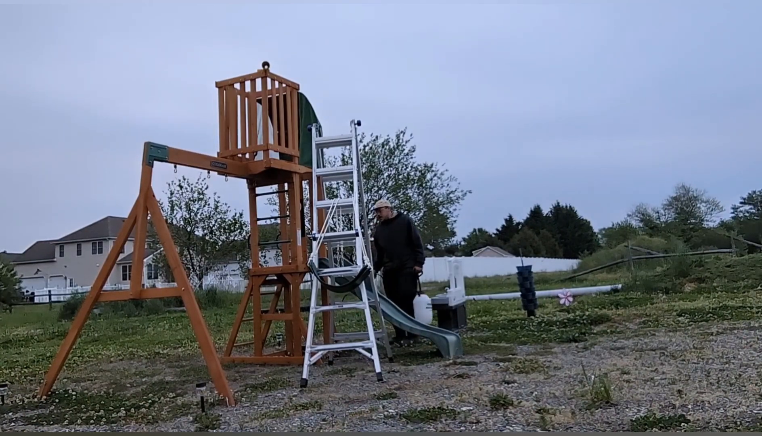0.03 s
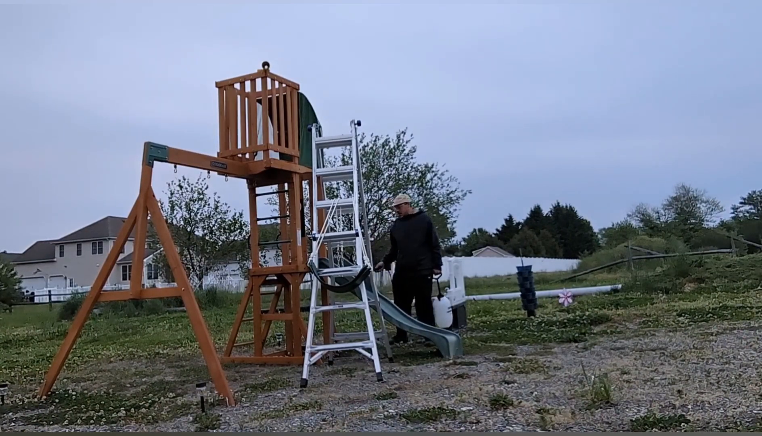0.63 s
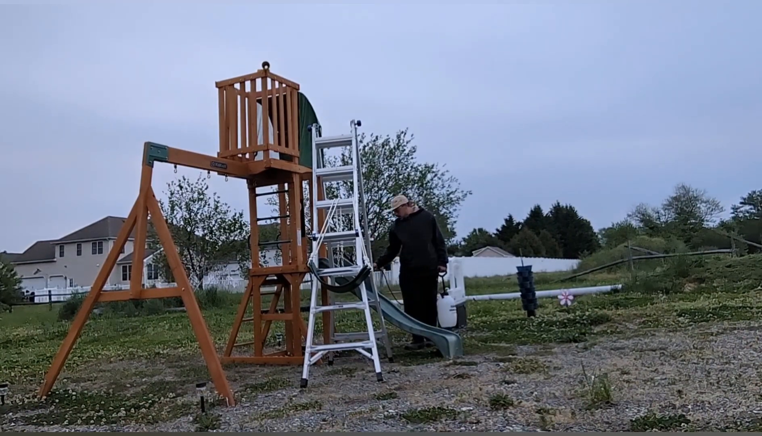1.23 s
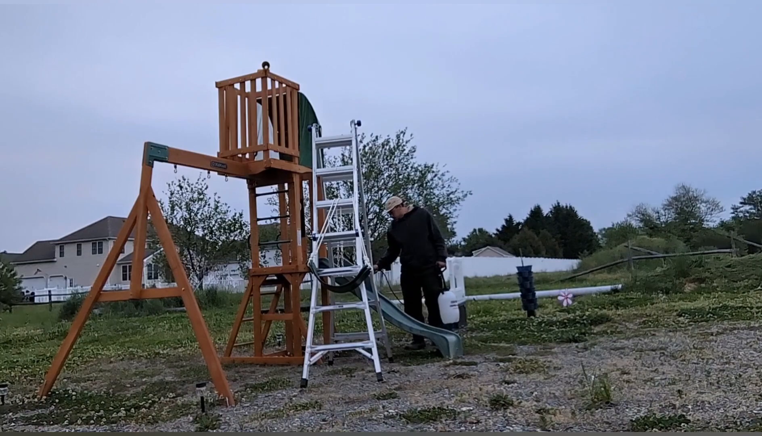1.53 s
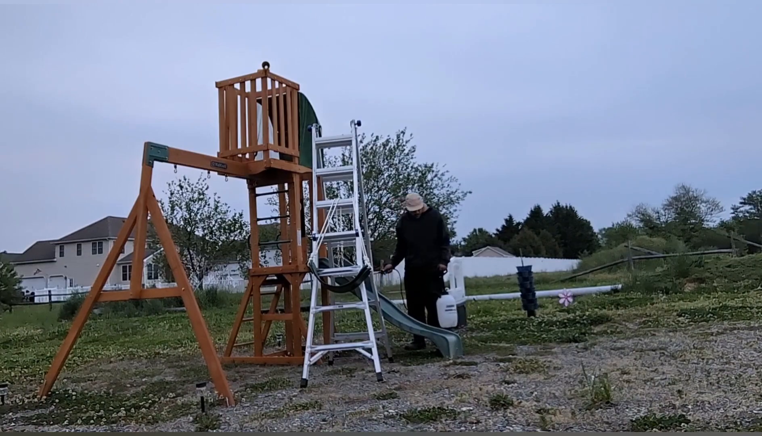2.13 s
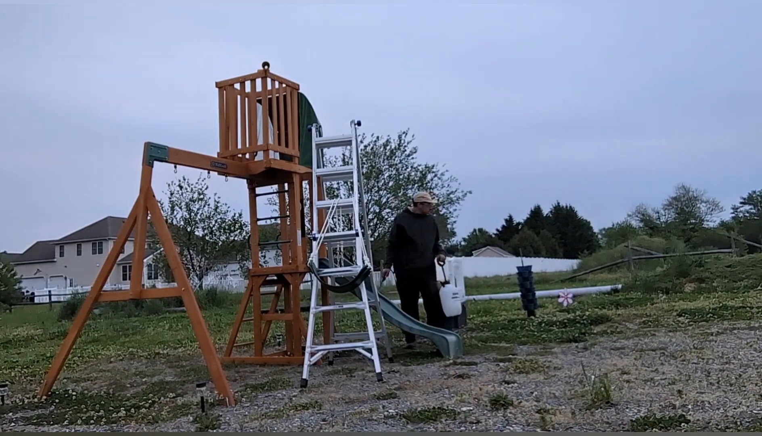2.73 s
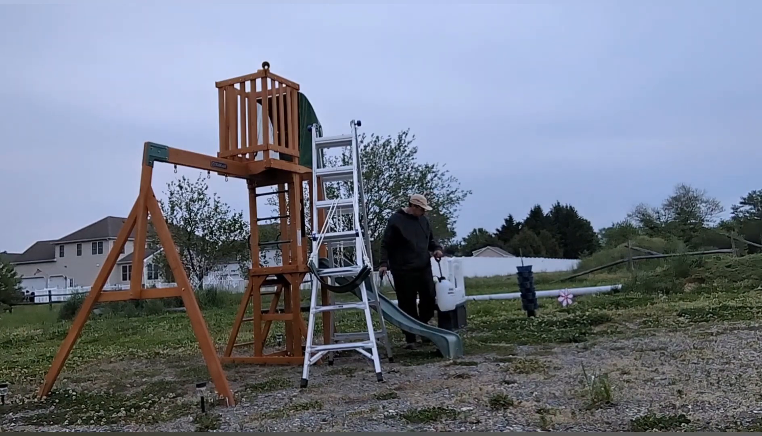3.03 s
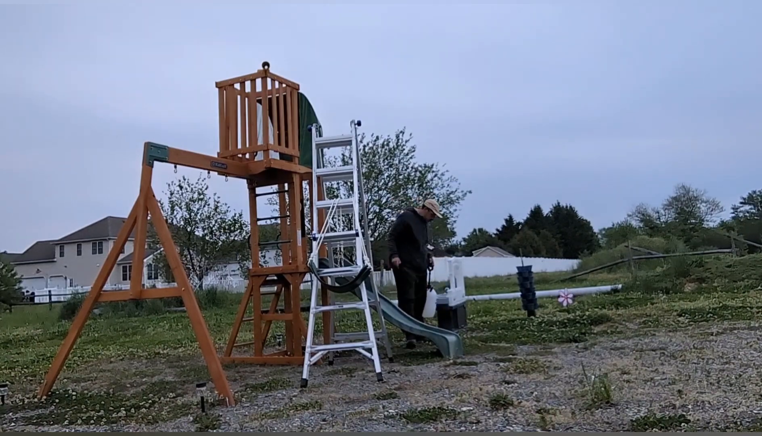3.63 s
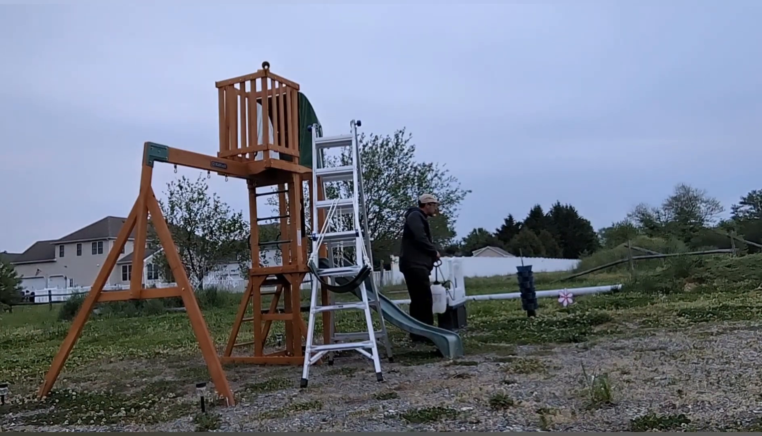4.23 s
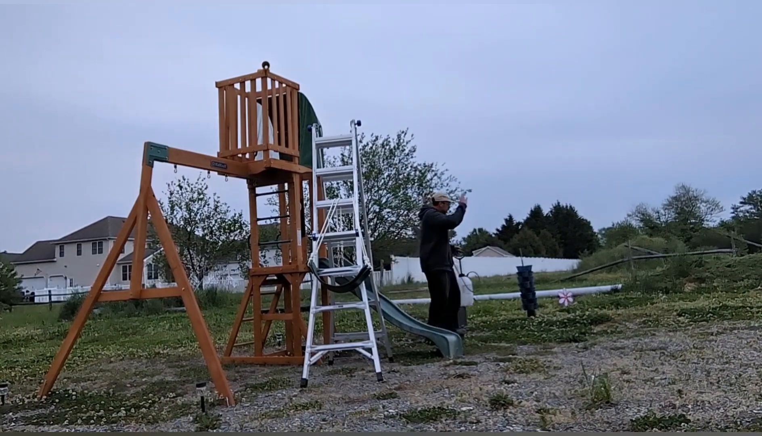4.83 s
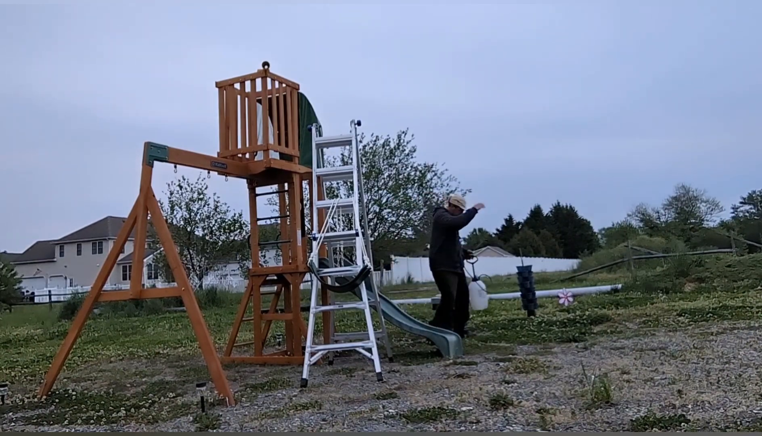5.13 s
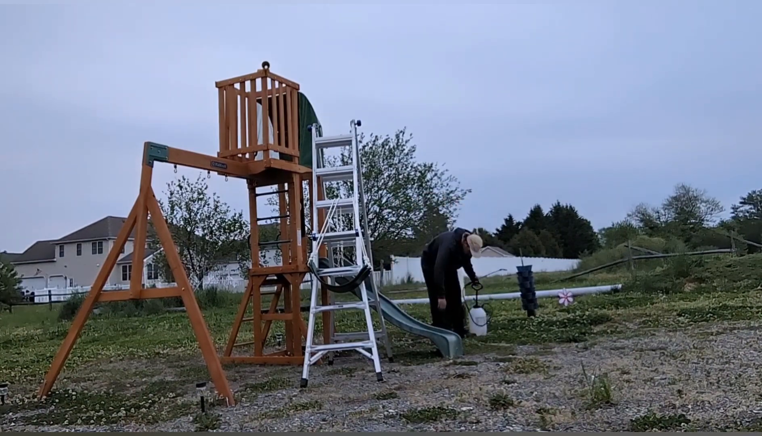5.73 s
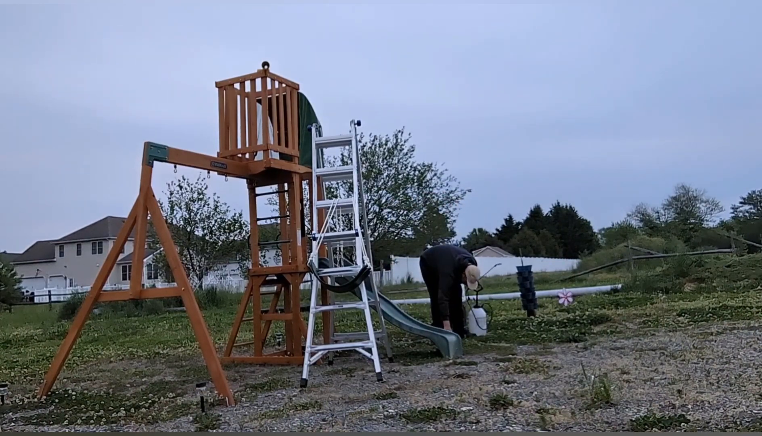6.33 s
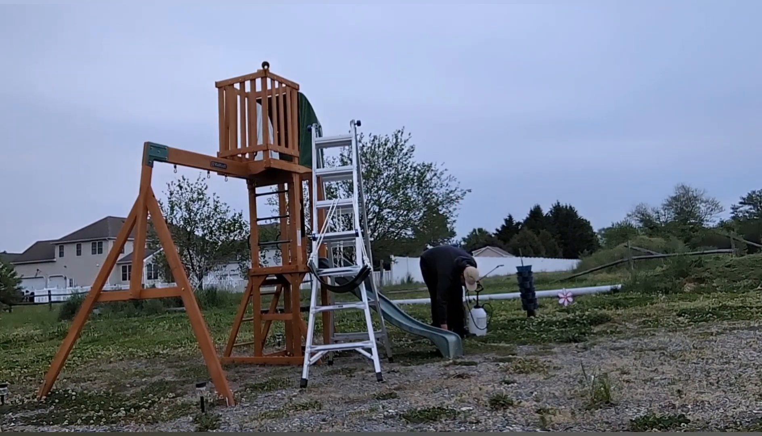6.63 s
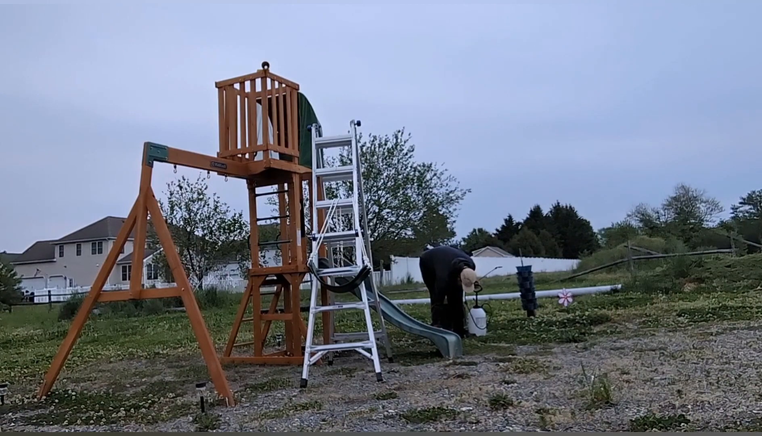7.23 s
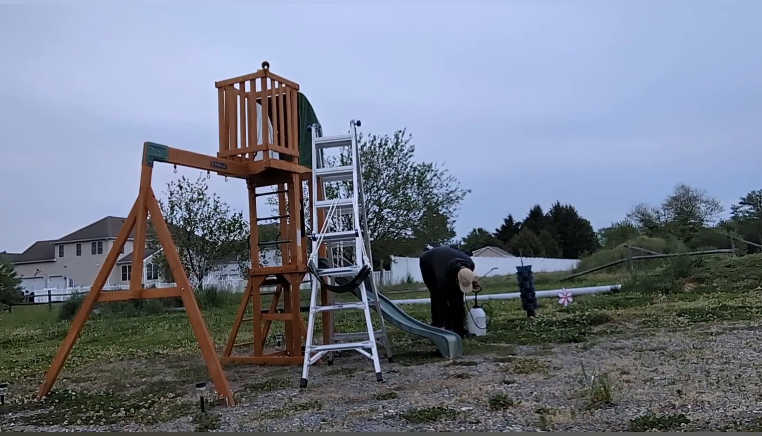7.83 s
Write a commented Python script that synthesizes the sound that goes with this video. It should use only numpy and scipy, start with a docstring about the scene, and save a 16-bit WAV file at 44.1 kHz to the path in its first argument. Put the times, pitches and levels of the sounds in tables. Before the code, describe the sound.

A small diesel tractor idles some way off, slightly to the right, in an open yard: a steady low puffing drone with light metallic clatter and hiss. Distant traffic lies softly behind it throughout. Closer and a little left, small dry ticks come around 0.9 and 1.5 seconds, and a hollow plastic jug is knocked at about 1.7 and 2.6 seconds, then faintly at 4.9. A soft dull bump comes at 3.7 seconds. From about 4.5 seconds the engine takes up a load, sagging slightly and growling around 5.5 as it pulls away. From 5.1 seconds to the end its loose panels rattle in short bouts, joined by metal clanks and dull bumps, the loudest at about 6.2. A few more ticks fall near 5.8 and 6.8 seconds. From about 6 seconds a light breeze rumbles on the microphones, building until the end at 8 seconds.

```python
"""A three-cylinder diesel, probably a small tractor, idles some way off to the right of an open yard.
Its firings puff from the pipe and ping the block. Then it pulls away: it sags under the load, growls,
and its loose panels rattle in bouts, with clanks and dull bumps, one louder than the rest. In front of
the two microphones a hollow plastic jug is knocked about by a play set, among a few small ticks.
Distant traffic lies behind it all, and late on a breeze gets up on the microphones."""
import sys
import numpy as np
from scipy import signal
from scipy.fft import rfft, irfft, next_fast_len
from scipy.io import wavfile
from scipy.ndimage import uniform_filter1d, map_coordinates

SR = 44100
rng = np.random.default_rng(int(sys.argv[2]) if len(sys.argv) > 2 else 0)


def file_out(sig):
    """Save sig as 16-bit WAV at sys.argv[1]."""
    # one column per channel
    cols = np.atleast_2d(sig).T
    # limit, then scale
    lim = np.clip(cols, -1, 1)
    pcm = np.round(lim * 32767).astype(np.int16)
    wavfile.write(sys.argv[1], SR, pcm)


N = 352359

# The crankshaft, sagging twice as it pulls away. Each row: time in seconds, four-stroke cycles a second.
ENGINE_SPEED = [(0.0, 15.952), (1.0, 15.939), (4.3, 15.939), (4.7, 15.873), (5.05, 15.9), (5.4, 15.739),
                (5.75, 15.615), (6.0, 15.825), (6.18, 16.074), (6.42, 15.709), (6.65, 15.927), (7.1, 15.88),
                (7.5, 15.904), (8.0, 15.764)]
# How hard the tractor pulls. Each row: time in seconds, load from 0 to 1.
ENGINE_LOAD = [(0, 0.15), (4.3, 0.15), (4.7, 0.35), (5.4, 0.46), (6.0, 0.72), (7.0, 0.76), (7.7, 0.83)]
IDLE_CYCLE_HZ = ENGINE_SPEED[0][1]
LABOUR_S, LABOUR_WIDTH_S = 5.53, 0.25   # the drive takes hold
def engine():
    """The diesel across the yard: one crankshaft times its exhaust, growl, clatter and panels."""
    load, = in_time(ENGINE_LOAD)
    cycles = np.cumsum(in_time(ENGINE_SPEED)[0]) / SR
    labour = np.exp(-((TIME - LABOUR_S) / LABOUR_WIDTH_S) ** 2)
    phases = puff_phases()
    body = exhaust_drone(cycles, load, labour, phases) + low_swells()
    body += growl(cycles, load, labour) + pipe_whine(cycles, labour, phases)
    metal = diesel_clatter(cycles, load) + loose_panels(cycles, load)
    return placed(below(body, 1800), left_db=1.3) + placed(below(metal, 7000), left_db=-0.1) + hiss(load)


# The pipe's note, idling and pulling. Each row: multiple of the cycle rate, relative level in dB.
IDLE_ORDERS = [(1, -40), (2, -35), (3, -5), (4, -15), (5, -20), (6, -2), (7, -10), (8, -7), (9, -4),
               (10, 1.5), (11, -17), (12, -9), (13, -19), (14, -10), (15, 1), (16, -21), (17, -21),
               (18, -16), (19, -25), (20, -20), (21, -24), (22, -22), (23, -24), (24, -21), (25, -24),
               (26, -21), (27, -14), (28, -23), (29, -24), (30, -13), (31, -25), (32, -21), (33, -16),
               (34, -26), (35, -29), (36, -20), (37, -28), (38, -25), (39, -22), (40, -28), (45, -25)]
LOADED_ORDERS = [(3, -13), (6, -6), (9, 0.5), (10, -12.5), (12, -8.5), (15, -3.5), (18, -15), (21, -47),
                 (24, -22), (27, -21), (30, -7), (33, -13.5), (36, -11), (39, -12), (42, -22.5), (48, -22),
                 (57, -17.5)]
# The exhaust rumble under the note. Each row: frequency in Hz, relative level in dB.
RUMBLE_SPECTRUM = [(20, -30), (33, -21), (42, 1), (52, -3.5), (90, -5), (130, 3.5), (220, 3), (290, -7),
                   (500, -26)]
def exhaust_drone(cycles, load, labour, phases):
    """Pipe and fan together: load leaves mainly the firing orders, and the drone sinks as it labours."""
    idle = (1 - 1.04 * load) * from_db(-3) * order_tones(cycles, IDLE_ORDERS, phases, waver=0.034)
    pulling = load * from_db(-6) * order_tones(cycles, LOADED_ORDERS, phases, waver=0.25)
    rumble = from_db(-12.5 + 5 * load) * coloured(rng.standard_normal(N), RUMBLE_SPECTRUM)
    hum = from_db(-0.8 * load) * fan_and_pump(cycles)
    return from_db(-46.5 + 4.5 * load - 3.5 * labour) * (idle + pulling + rumble + hum)


def puff_phases(smear_turns=0.4):
    """The upper firing orders keep step and give each puff an edge, which the pipe smears."""
    orders, scatter = np.arange(64), rng.random(64)
    in_step = (orders % 3 == 0) & (orders >= 18)
    first_firing = FIRINGS[0][0]
    return np.where(in_step, smear_turns * scatter - orders * first_firing, scatter)


# Three firings, then valve and injector taps. Each row: place in the cycle from 0 to 1, relative dB.
CONTACTS = [(.147, 0), (.468, -1.5), (.815, -1), (.062, -9), (.105, -7), (.125, -8), (.18, -8), (.387, -8),
            (.452, -6), (.5, -10), (.612, -11), (.79, -9), (.865, -10), (.965, -10)]
FIRINGS = CONTACTS[:3]
# One cylinder's injection and firing. Each row: place in the cycle from 0 to 1, relative dB.
CYLINDER_PINGS = [(.0447, -7), (.13, 0)]
# What a ping rings. Each row: frequency in Hz, relative level in dB, seconds to fall 60 dB.
BLOCK_RESONANCES = [(1722, -13, .04), (2056, 2, .03), (2230, -5, .016)]
# The tapped block, heard across the yard. Each row: frequency in Hz, relative level in dB.
BLOCK_SPECTRUM = [(700, -63), (1150, 1.5), (1350, -20.5), (1720, 5), (1930, -3.5), (2056, -4.5),
                  (2300, -2.5), (2620, -10), (2790, -2.5), (2930, -15), (3100, -9), (3700, -16),
                  (5500, -32), (9000, -53)]
# Orders that meet the valve cover's resonances. Each row: multiple of the cycle rate, relative dB.
COVER_ORDERS = [(102, -3), (108, -2), (154, -3), (162, -4), (174, -6), (175, 0), (178, -5), (195, -9)]
# Slight swells in the clatter. Each row: time in seconds, gain in dB.
CLATTER_SWELL = [(0, -2), (.6, -2.2), (.98, -0.5), (1.5, -2.5), (3.4, -2.5), (3.78, -1), (4.0, -3)]
def diesel_clatter(cycles, load):
    """Taps, block pings, the singing cover and a scattered wash: even at idle, looser under load."""
    shaky = cycles + (0.0002 + 0.003 * load) * drift(30)
    taps = hammer(shaky, CONTACTS, np.ones(1), uneven_db=3)
    pings = [(place + cylinder / 3, db) for cylinder in range(3) for place, db in CYLINDER_PINGS]
    block = hammer(shaky, pings, strike(BLOCK_RESONANCES, spread_db=0), uneven_db=0.5)
    cover = order_tones(shaky, COVER_ORDERS, rng.random(200), waver=0.31)
    ringing = from_db(-6 * load) * (from_db(1.9) * block + from_db(-1.5) * cover)
    pulses = blows(cycles, CONTACTS, decay_s=0.003, uneven_db=0.3, sustain=0.38)
    wash = rms_one(pulses * cyclic_noise(cycles, fresh=0.12 + 0.8 * load))
    impacts = from_db(-3 - 4 * load) * taps + from_db(2 * load) * wash
    knock = from_db(6 + 2 * load) * coloured(impacts, BLOCK_SPECTRUM)
    softening_db = -3.5 * np.minimum(load / 0.33, 1)   # as soon as there is something to pull
    swell_db, = in_time(CLATTER_SWELL)
    return from_db(-60.5 + 0.5 * load + softening_db + swell_db) * (knock + ringing)


# The engine body's voice. Each row: frequency in Hz, relative level in dB.
GROWL_SPECTRUM = [(30, -39), (200, -39), (290, 0), (350, 1), (430, 6.5), (520, 2), (610, -2), (720, -1.5),
                  (880, -4.5), (1000, -15), (1300, -4), (2000, -26)]
def growl(cycles, load, labour):
    """Each firing thuds through the engine body, louder and rougher as it pulls."""
    thuds = blows(cycles, FIRINGS, decay_s=0.006, uneven_db=0.7, sustain=0.7)
    vibration = thuds * cyclic_noise(cycles, fresh=0.55 + 0.4 * load)
    return from_db(-63 + 13 * load + 4 * labour) * coloured(vibration, GROWL_SPECTRUM)


# The pipe's whine. Each row: multiple of the cycle rate, relative level in dB.
WHINE_ORDERS = [(33, 0), (36, -5), (39, -2)]
def pipe_whine(cycles, labour, phases):
    """The pipe whines briefly while the engine labours."""
    return from_db(-60.5) * labour * order_tones(cycles, WHINE_ORDERS, phases, waver=0.1)


# The belt-driven fan and pump. Each row: multiple of the cycle rate, relative level in dB.
BELT_ORDERS = [(12.7, -9), (21.67, -20)]
def fan_and_pump(cycles, waver=0.15):
    """Fan and pump hum at speeds tied to the crankshaft."""
    return sum(np.sqrt(2) * from_db(db) * (1 + waver * drift(7.5)) * np.sin(2 * np.pi * order * cycles)
               for order, db in BELT_ORDERS)


# Firings throw a panel at the frame, two hard. Each row: place in the cycle from 0 to 1, relative dB.
PANEL_SLAPS = [(.09, 0), (.425, 0.5), (.77, -5)]
# The panels' buzz. Each row: frequency in Hz, relative level in dB.
PANEL_SPECTRUM = [(300, -60), (700, -38), (1100, -3.5), (1500, -6.5), (1740, 6), (1850, 1), (2100, 0.5),
                  (2300, -2.5), (2650, -1), (3050, -6.5), (3700, -10), (6000, -23.5), (9000, -60)]
# The loudest panel's ring, sliding as the frame flexes. Each row: time in seconds, pitch in Hz.
PANEL_PITCH = [(5.14, 2100), (5.3, 1960), (5.42, 2080), (5.5, 2020), (5.58, 1860), (5.95, 1980),
               (6.15, 2045), (6.6, 2090), (8, 2064)]
# Rattling on the move. Each row: start in seconds, length in seconds, level in dB.
RATTLE_BOUTS = [(5.11, 0.19, -60), (5.40, 0.188, -58), (5.93, 0.12, -65), (6.1, 0.29, -64.5),
                (6.59, 0.22, -63.5), (7.16, 0.076, -61), (7.48, 0.05, -59), (7.62, 0.13, -60),
                (7.9, 0.17, -71)]
def loose_panels(cycles, load, wander_hz=50):
    """Loose panels buzz at each firing, in bouts; one slaps the frame and rings briefly."""
    shakes = blows(cycles, PANEL_SLAPS, decay_s=0.008, uneven_db=1.2, sustain=0.7)
    buzz = coloured(shakes * cyclic_noise(cycles, fresh=0.75), PANEL_SPECTRUM)
    slaps = blows(cycles, PANEL_SLAPS, decay_s=0.0045, uneven_db=1.5, sustain=0.25)
    ring_hz = in_time(PANEL_PITCH)[0] + wander_hz * drift(120)
    ring = rms_one(uniform_filter1d(slaps, size=90) * np.sin(2 * np.pi * np.cumsum(ring_hz) / SR))
    shaking = from_db(-52) * load ** 2 + bouts(RATTLE_BOUTS, attack_s=0.0032, release_s=0.0076)
    return shaking * rms_one(buzz + from_db(-1) * ring)


# Low swells from across the yard. Each row: start in seconds, length in seconds, level in dB.
LOW_SWELLS = [(5.92, 0.15, -49.5), (6.58, 0.15, -49), (6.84, 0.13, -49), (7.78, 0.028, -44.5)]
# Their narrow bass band. Each row: frequency in Hz, relative level in dB.
SWELL_SPECTRUM = [(20, -60), (60, -20), (85, -7), (125, 18.5), (150, 17), (190, -45), (300, -45)]
def low_swells():
    """Brief low swells near 125-150 Hz in the engine's drone as it pulls."""
    swells = bouts(LOW_SWELLS, attack_s=0.024, release_s=0.043)
    return swells * coloured(rng.standard_normal(N), SWELL_SPECTRUM)


# The engine's hiss and its highest treble. Each row: frequency in Hz, relative level in dB.
HISS_SPECTRUM = [(2000, 3.5), (4200, -0.5), (5400, -3.5), (6800, -0.5), (8200, -4.5), (9300, -16),
                 (11000, -16), (15500, -65)]
TREBLE_SPECTRUM = [(7000, -15.5), (9300, -3), (10200, -9), (12500, -9.5), (14000, -19), (15000, -13),
                   (15800, -32)]
# The treble swells and sinks. Each row: time in seconds, base level in dB.
TREBLE_LEVEL = [(0.0, -76), (0.93, -74.5), (1.42, -75.5), (2.22, -78), (2.69, -75.5), (3.38, -75.5),
                (3.61, -74.5), (4.98, -74), (5.09, -74.5), (5.56, -78), (7.59, -71), (7.99, -70)]
def hiss(load):
    """Hiss from the engine's side, part direct and part scattered; its lower band grows with load."""
    top_db, = in_time(TREBLE_LEVEL)
    low_db = -63.5 + 3 * load + 0.38 * (top_db - top_db.mean())
    low = below(coloured(rng.standard_normal((3, N)), HISS_SPECTRUM), 9600)
    top = coloured(rng.standard_normal((3, N)), TREBLE_SPECTRUM)
    low = placed(low[0], left_db=-0.5) + from_db(-8.5) * low[1:]   # direct + scattered
    top = placed(top[0], left_db=0) + from_db(-5) * top[1:]
    shadow = from_db([[-1.7], [1.7]])   # the case shades the far microphone from the highest treble
    low *= from_db(low_db + 0.5 * drift(16))
    top *= from_db(top_db - load + 1.1 * drift(19))
    return low + shadow * top


# Bumps, then clanks, out at the tractor. Each row: start in seconds, relative dB, hardness in dB/octave.
BUMPS = [(3.715, -41, -2), (5.385, -39, 2.5), (5.765, -38, -1.5), (6.229, -29, 6.5), (6.247, -35.5, -6.5),
         (6.272, -46, 4), (7.63, -38.5, 9)]
CLANKS = [(6.127, -41.5, 8), (6.249, -40, 2), (6.611, -40, 20), (6.63, -38.5, 9), (6.674, -45, 16),
          (6.735, -37, -6), (7.069, -42, 6), (7.196, -45.5, 5), (7.51, -48, 6), (7.658, -45, 10),
          (7.742, -44, 0), (7.931, -43.5, 8)]
# What each rings. Each row: frequency in Hz, relative level in dB, seconds to fall 60 dB.
BUMP_MODES = [(87.5, -5.5, 0.11), (121.6, 4, 0.13), (151, 7.5, 0.064), (315, -2, 0.034), (431, -1.5, 0.059),
              (460, -5, 0.032)]
CLANK_MODES = [(2166, 19.5, 0.067), (2320, 6, 0.032), (2640, 9, 0.03), (3130, 4.5, 0.043),
               (3340, 4.5, 0.022)]
def bumps_and_clanks():
    """The machine bumps dully and its loose metal clanks; a harder blow favours the upper modes."""
    track = np.zeros(N)
    for s, db, hardness in BUMPS:
        add(track, s, from_db(db - 7) * strike(tilted(BUMP_MODES, hardness, 220), spread_db=1.5))
    for s, db, hardness in CLANKS:
        add(track, s, from_db(db - 22) * strike(tilted(CLANK_MODES, hardness, 2280), spread_db=3.5))
    return placed(track, left_db=0.5)


# Knocks by the play set, in front of the microphones. Each row: start in seconds, relative level in dB,
# centre in Hz, dB lost per octave away from it (gained if negative).
JUG_KNOCKS = [(1.666, -45, 1090, 20), (1.675, -44, 1000, 24), (1.68, -48, 780, 22), (1.685, -40, 940, 26),
              (1.692, -39, 960, 30), (2.515, -56.5, 1050, 6), (2.557, -49, 1100, 5), (2.564, -48, 720, 16),
              (2.57, -48, 895, -15), (2.577, -37, 1300, 17), (2.583, -45, 900, -14), (2.6, -48, 750, 3),
              (4.905, -53, 860, 3), (4.932, -56, 850, 6)]
# The hollow jug. Each row: frequency in Hz, relative level in dB, seconds to fall 60 dB.
JUG_MODES = [(607, -7.5, 0.047), (758, 3.5, 0.033), (880, -3.5, 0.034), (940, -1.5, 0.053),
             (1094, -6, 0.03), (1240, 0, 0.024), (1405, -10.5, 0.025)]
def plastic_jug():
    """Each knock rings the jug's modes in a different balance, louder at the left microphone."""
    track = np.zeros(N)
    for s, db, centre_hz, loss_db in JUG_KNOCKS:
        modes = [(hz, mode_db - loss_db * abs(np.log2(hz / centre_hz)), t60)
                 for hz, mode_db, t60 in JUG_MODES]
        add(track, s, from_db(db - 5.5) * strike(modes, spread_db=2.5))
    return placed(track, left_db=5, lag_samples=1.3)


# Ticks and scuffs by the jug. Each row: start in seconds, level in dB, centre in Hz, decay in seconds.
TICKS = [(.85, -58, 7000, .005), (1.443, -55, 10000, .005), (1.445, -55.5, 3800, .005),
         (1.543, -56, 3900, .012), (1.551, -49.5, 3800, .004), (2.535, -62, 12000, .006),
         (5.765, -59, 5000, .018), (5.79, -54, 5500, .014), (6.82, -57, 6000, .006)]
def small_ticks():
    """Dry ticks, each a narrow band of noise that dies at once."""
    track, t = np.zeros(N), TIME[:SR // 20]
    for s, db, hz, decay_s in TICKS:
        band = signal.butter(2, [hz * 0.84, hz * 1.14], "band", fs=SR, output="sos")
        crack = signal.sosfilt(band, rng.standard_normal(len(t)) * np.exp(-t / decay_s))
        add(track, s, from_db(db) * crack / np.abs(crack).max())
    return placed(track, left_db=5, lag_samples=1.3)


# Wind right on the microphones. Each row: time in seconds, level in dB.
BREEZE_LEVEL = [(5.5, -72.5), (6.0, -63), (8, -58.5)]
# Its low rumble. Each row: frequency in Hz, relative level in dB.
BREEZE_SPECTRUM = [(20, -39), (45, -28), (62, -11), (90, 10.5), (160, -17), (400, -33.5)]
def breeze():
    """Light gusts, different at each microphone."""
    gusts = from_db(in_time(BREEZE_LEVEL)[0] + drift(12))
    return gusts * coloured(rng.standard_normal((2, N)), BREEZE_SPECTRUM)


# Traffic and open air far beyond the yard. Each row: frequency in Hz, relative level in dB.
AIR_SPECTRUM = [(20, -22), (35, -14), (55, 15), (150, 12.5), (400, -3.5), (900, -23.5), (1500, -2),
                (3000, -0.5), (7000, -42.5), (15000, -54)]
def open_air(level_db=-61.5, shared_hz=400):
    """Far noise from all round: alike at both microphones only in the bass."""
    mid, side = rng.standard_normal((2, N))
    side = signal.sosfilt(signal.butter(1, shared_hz, "high", fs=SR, output="sos"), side)
    far = below(np.array([mid + side, mid - side]), 8000)   # distance takes the top off
    return from_db(level_db) * coloured(far, AIR_SPECTRUM)


def order_tones(cycles, orders, phases, waver):
    """Clean engine orders, each wavering on its way across the yard; rms 1."""
    tones = (from_db(db) * (1 + waver * drift(9)) * np.sin(2 * np.pi * (order * cycles + phases[order]))
             for order, db in orders)
    return rms_one(sum(tones))


def cyclic_noise(cycles, fresh):
    """Vibration that repeats with every engine cycle, plus a share that is new each time."""
    length = int(SR / IDLE_CYCLE_HZ)
    same = map_coordinates(rng.standard_normal(length), [cycles % 1 * length], order=3, mode="grid-wrap")
    return np.sqrt(1 - fresh) * same + np.sqrt(fresh) * rng.standard_normal(N)


def blows(cycles, contacts, decay_s, uneven_db, sustain):
    """Envelope of the contacts in each cycle: every one jumps up and dies away."""
    power = sustain ** 2
    for place, db in contacts:
        turn, since = np.divmod(cycles - place + 2, 1)
        strength = from_db(db + uneven_db * rng.standard_normal(200))[turn.astype(int)]
        power = power + (strength * np.exp(-since / IDLE_CYCLE_HZ / decay_s)) ** 2
    return np.sqrt(power)


def hammer(cycles, contacts, sound, uneven_db):
    """Every contact plays a short sound once in each cycle; rms 1."""
    clicks = np.zeros(N)
    for place, db in contacts:
        at = np.flatnonzero(np.diff(np.floor(cycles - place)) > 0)
        clicks[at] += from_db(db + uneven_db * rng.standard_normal(200)[:len(at)])
    return rms_one(signal.fftconvolve(clicks, sound)[:N])


def strike(modes, spread_db):
    """A third of a second of modes ringing, each with a strength of its own."""
    t = TIME[:SR // 3]
    ring = np.zeros(len(t))
    for k, (hz, db, t60) in enumerate(modes):
        envelope = from_db(db + spread_db * rng.standard_normal() - 60 * t / t60)
        ring += (-1) ** k * envelope * np.sin(2 * np.pi * hz * t)
    return ring


def tilted(modes, tilt_db, pivot_hz):
    """Tilt the modes' levels by dB per octave about a pivot."""
    return [(hz, db + tilt_db * np.log2(hz / pivot_hz), t60) for hz, db, t60 in modes]


def bouts(rows, attack_s, release_s):
    """Gain of a series of bouts: each rises, holds and dies away."""
    return sum(from_db(db) * np.clip((TIME - s) / attack_s, 0, 1)
               * np.exp(-np.maximum(TIME - s - length, 0) / release_s) for s, length, db in rows)


def placed(x, left_db, lag_samples=17):
    """A source on the right reaches the left microphone later; left_db is left level over right."""
    late = np.interp(np.arange(N) - lag_samples, np.arange(N), x)
    return np.array([late * from_db(left_db / 2), x * from_db(-left_db / 2)])


def coloured(x, spectrum):
    """Give a steady sound a spectrum; rms 1."""
    hz, db = np.transpose(spectrum)
    size = next_fast_len(N + SR // 2)
    bin_hz = np.maximum(np.arange(size // 2 + 1) * SR / size, 1)
    gain = from_db(np.interp(np.log(bin_hz), np.log(hz), db))
    return rms_one(irfft(rfft(x, size) * gain, size)[..., :N])


def below(x, edge_hz):
    """A steep low-pass."""
    return signal.sosfilt(signal.butter(8, edge_hz, fs=SR, output="sos"), x)


TIME = np.arange(N) / SR
def in_time(rows):
    """Each column of a curve at every sample."""
    s, *columns = np.transpose(rows)
    return [np.interp(TIME, s, c) for c in columns]


def drift(rate_hz):
    """A random wander; rms 1."""
    points = rng.standard_normal(1000)
    return rms_one(np.interp(TIME * rate_hz, np.arange(len(points)), points))


def add(track, s, sound):
    """Lay a sound into a track at a time."""
    start = round(s * SR)
    track[start:start + len(sound)] += sound[:N - start]


def from_db(db):
    """Decibels to gain."""
    return 10 ** (np.asarray(db) / 20)


def rms_one(x):
    """Scale to rms 1."""
    return x / np.sqrt(np.mean(x ** 2) + 1e-20)


def scene():
    """The yard at the two microphones."""
    return engine() + open_air() + breeze() + plastic_jug() + bumps_and_clanks() + small_ticks()


LOW_CUT_HZ, HIGH_CUT_HZ = 30, 15600
def record(dry):
    """The deepest bass is rolled off and the top is cut steeply."""
    dry = signal.sosfilt(signal.butter(3, LOW_CUT_HZ, "high", fs=SR, output="sos"), dry)
    return signal.sosfilt(signal.ellip(12, 0.1, 80, HIGH_CUT_HZ, fs=SR, output="sos"), dry)


dry = scene()
out = record(dry)
file_out(out)
```